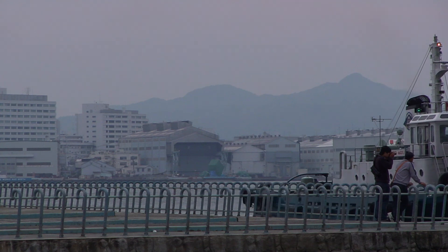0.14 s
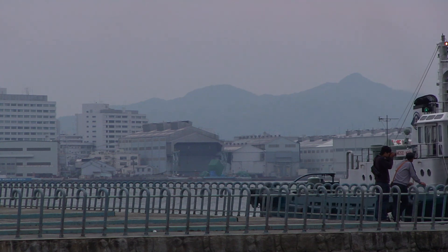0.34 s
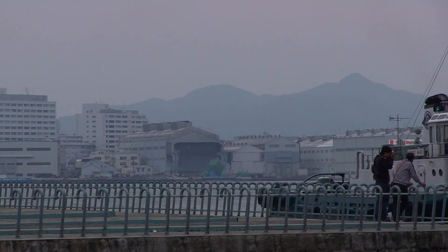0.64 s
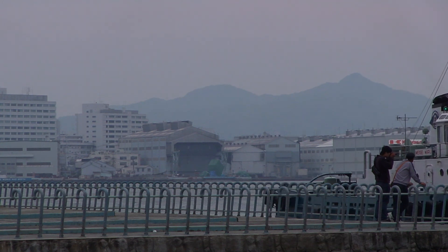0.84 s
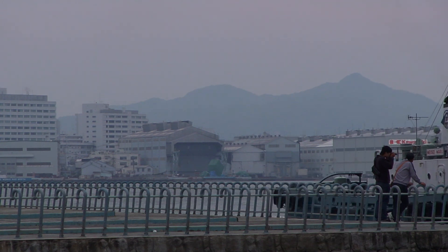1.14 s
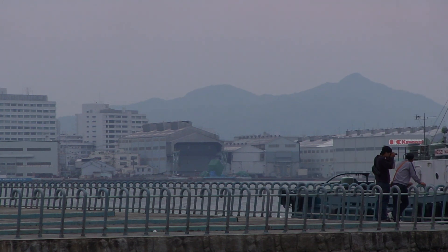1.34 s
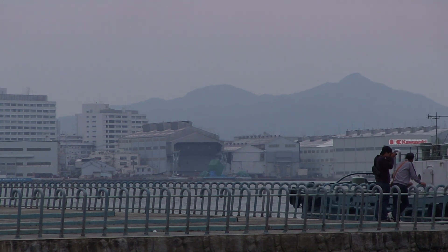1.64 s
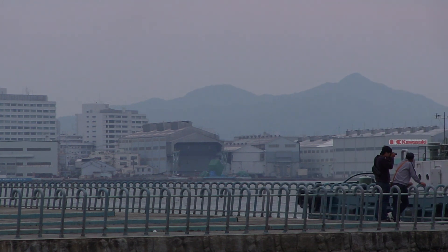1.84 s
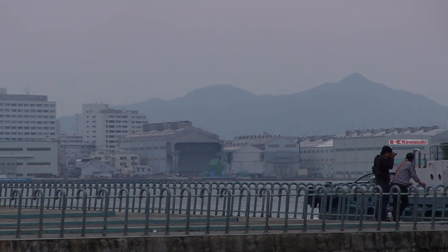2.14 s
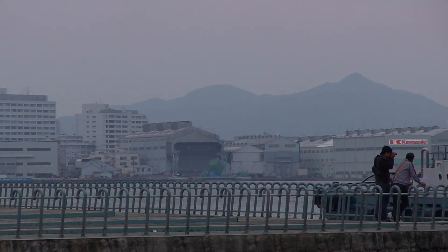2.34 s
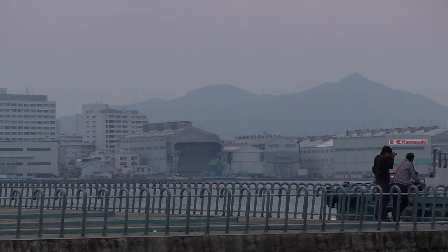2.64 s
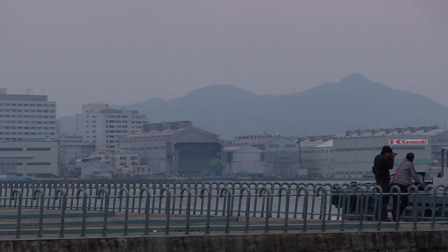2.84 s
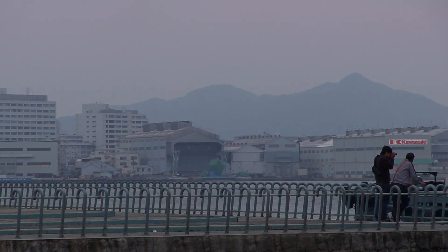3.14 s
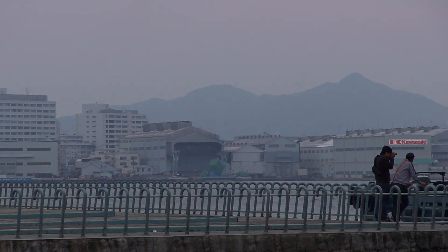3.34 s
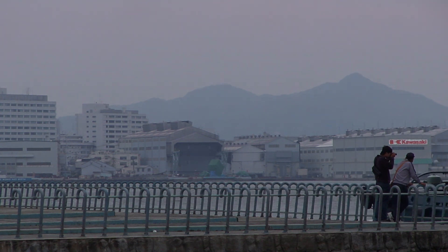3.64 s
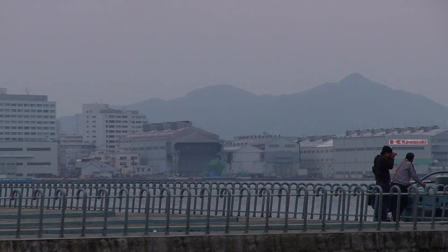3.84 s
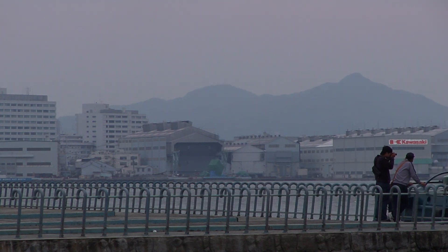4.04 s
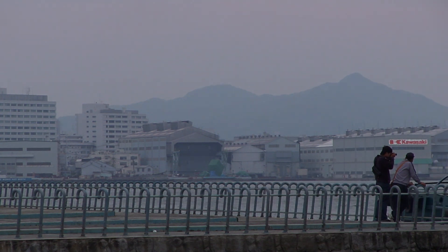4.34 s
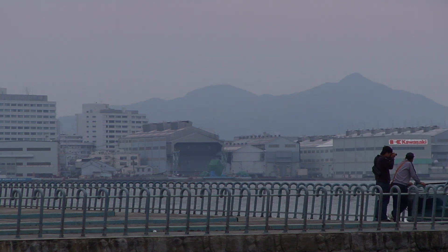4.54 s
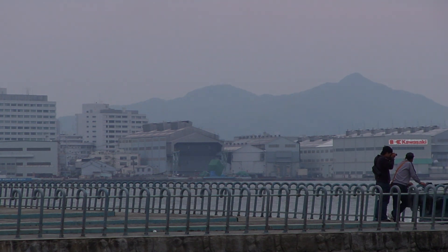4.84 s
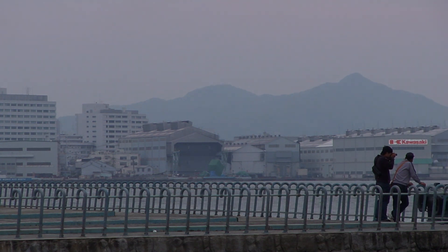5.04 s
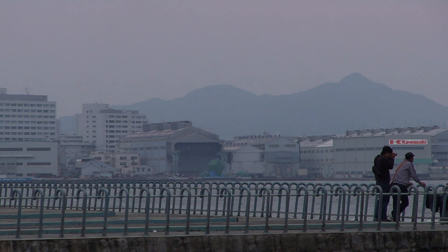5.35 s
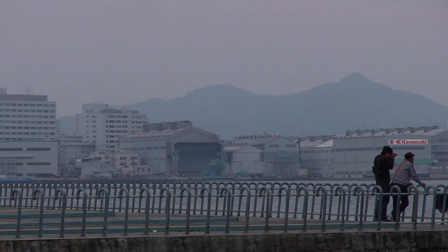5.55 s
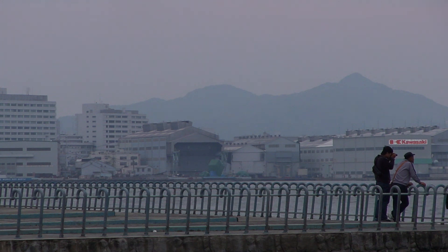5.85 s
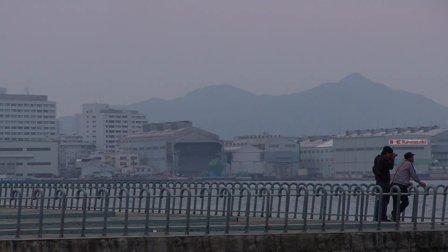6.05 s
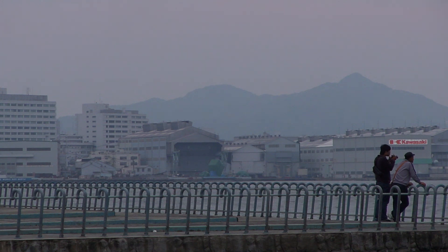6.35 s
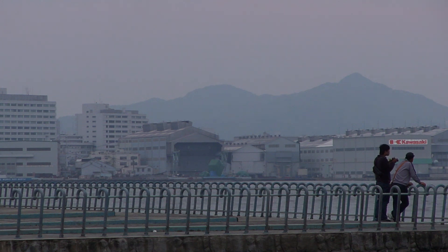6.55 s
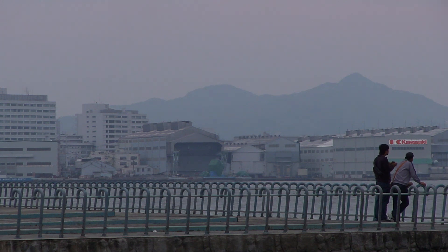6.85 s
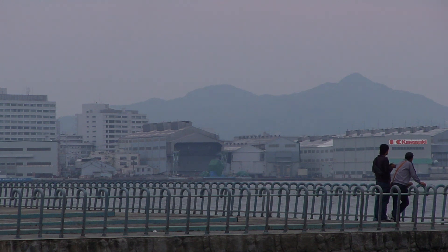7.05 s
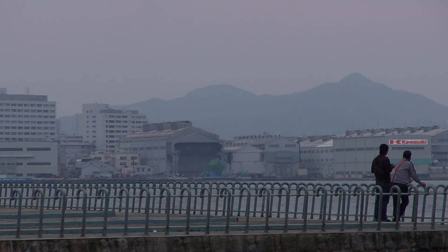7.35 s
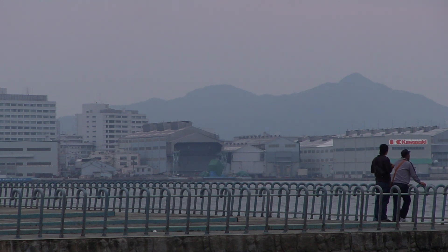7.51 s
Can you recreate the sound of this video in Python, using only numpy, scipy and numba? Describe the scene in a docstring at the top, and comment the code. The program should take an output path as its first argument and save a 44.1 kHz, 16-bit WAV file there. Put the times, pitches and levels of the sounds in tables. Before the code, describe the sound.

A smooth, dull roar of harbour machinery, wind and open water runs throughout, with soft uneven lapping at a pier. A tug's diesels drone low and slightly right, their close tones beating and wavering, fullest around 4 seconds. A hollow, breathy whirr near 900 Hz fluctuates above them. Tiny bright drops tick close by around 1, 1.3 and 2.3-2.5 seconds, then at 5, 6.4 and 6.9. Low gusts buffet the microphone at about 3-3.5 and 4.4-5 seconds, with two merged dull thumps, mainly left, near 4.9; weaker rumble follows from 6 to 7. From about 4 seconds churned water and fine foamy hiss grow, strongest from 5.7 onward with a peak near 7. A second whirr enters around 5.4, narrows to a held note, then climbs and spreads after 7. The treble is muffled; the sound ends with the wake still running at 7.6.

```python
"""An even port roar and a diesel drone, a little to the right, as a tug passes a harbour pier.
Noise bands make the roar and lapping, wandering sines the engines, and moving resonances the hollow whirr.
A second whirr joins and climbs, while churned water and bursting bubbles hiss louder astern.
Bright drops tick close by; low rumbling gusts and two dull blows strike the camera's microphone."""
import sys
import numpy as np
from scipy import signal
from scipy.fft import rfft, irfft
from scipy.io import wavfile
from numba import njit

SR = 44100
rng = np.random.default_rng(int(sys.argv[2]) if len(sys.argv) > 2 else 0)


def digitize_waveform(pressure):
    """Quantize a signal to 16-bit integers and store it at the path in sys.argv[1].

    Rows of a 2-D input are taken as channels; values are limited to [-1, 1].
    """
    field = np.atleast_2d(pressure).T
    bounded = np.clip(field, -1, 1)
    quanta = np.round(bounded * 32767).astype(np.int16)
    wavfile.write(sys.argv[1], SR, quanta)


N = 338688
TIME = np.arange(N) / SR  # s
FREQS = np.maximum(np.arange(N // 2 + 1) * SR / N, 1)  # Hz, kept above 0 for the logarithm
LEFT_RIGHT_SIGNS = np.array([[1], [-1]])  # a side signal is added left and subtracted right


def from_db(db):
    """Decibels to gain."""
    return 10 ** (np.asarray(db) / 20)


def rms_one(x):
    """Scale to unit power."""
    return x / np.sqrt(np.mean(np.abs(x) ** 2) + 1e-20)


def in_time(rows):
    """Each column of a curve, joined by straight lines, at every sample."""
    s, *columns = np.transpose(rows)
    return [np.interp(TIME, s, column) for column in columns]


def gain_at_freqs(points):
    """A short spectrum as gains, joined on a log-frequency axis."""
    hz, db = np.transpose(points)
    return from_db(np.interp(np.log(FREQS), np.log(hz), db))


def drift(rate_hz):
    """Slow chance with spread 1, changing about rate_hz times a second."""
    lowpass = 1 / (1 + (FREQS / rate_hz) ** 2)
    return rms_one(irfft(rfft(rng.standard_normal(N)) * lowpass, N))


def bump(s, half_length_s):
    """A smooth bell-shaped rise and fall around time s."""
    return np.exp(-.5 * ((TIME - s) / half_length_s) ** 2)


def fade_in(s, attack_s):
    """An even rise from 0 to 1, starting at time s."""
    return np.clip((TIME - s) / attack_s, 0, 1)


def field(excitation, spectrum, width, lag_s=0):
    """Colour two unrelated signals as middle and side; sound from the right reaches the left port late."""
    mid, side = rfft(excitation) * gain_at_freqs(spectrum) * np.sqrt(SR / 2)  # white noise to dB per Hz
    side = side * gain_at_freqs(width)
    late = np.exp(-2j * np.pi * FREQS * lag_s)
    return irfft(np.array([(mid + side) * late, mid - side]), N)


@njit
def resonate(noise, hz, width_hz, sr):
    """Noise through a moving two-stage resonance, at even power."""
    out, first, second = np.zeros(len(noise)), 0j, 0j
    for i in range(len(noise)):
        # two stages narrow the band, so each is 1.55 times as wide
        r = np.exp(-np.pi * 1.55 * width_hz[i] / sr)
        pole = r * np.exp(2j * np.pi * hz[i] / sr)
        first = pole * first + np.sqrt(1 - r) * noise[i]
        second = pole * second + (1 - r) * first
        out[i] = second.real
    return out


def hollow(hz, width_hz, side_db=-15):
    """Stereo turbulence ringing in one resonance; its middle has rms 1."""
    hz = hz + np.zeros(N)
    width_hz = np.abs(width_hz) + np.zeros(N)
    mid, side = [rms_one(resonate(noise, hz, width_hz, float(SR)))
                 for noise in rng.standard_normal((2, N))]
    return mid + from_db(side_db) * side * LEFT_RIGHT_SIGNS


# roar of port, wind and open water, before its overall level: freq_hz [Hz], level_db [dB per Hz]
ROAR_SPECTRUM = [(25, -104), (48, -98.5), (73, -78), (100, -67.5), (165, -61), (330, -63.5), (620, -60),
                 (1400, -63), (2050, -70.5), (3050, -90.5), (4500, -98), (5900, -90), (8300, -99),
                 (10200, -106)]
# wavelets lapping at the pier: freq_hz [Hz], level_db [dB per Hz]
LAPPING_SPECTRUM = [(80, -99.5), (180, -71.5), (400, -67), (750, -75), (1400, -73), (4000, -125)]
# stereo width of the far field: freq_hz [Hz], side_minus_mid_db [dB]
FAR_FIELD_WIDTH = [(50, 4), (150, -24), (300, -18), (600, -18), (1000, -15), (2000, -10.5), (3500, -7),
                   (6000, -5.5), (10000, -0.5)]
# brief swells in the roar, before the low cut:
# peak_s [s], half_length_s [s], centre_hz [Hz], width_hz [Hz], level_db [dB rms at the peak]
ROAR_SWELLS = [(1.502, 0.14, 1080, 76, -39.5), (2.246, 0.049, 147, 54, -34), (3.522, 0.1, 1450, 250, -39),
               (3.88, 0.083, 820, 50, -36), (4.02, 0.025, 260, 190, -38), (4.078, 0.094, 408, 13, -38),
               (4.6, 0.49, 997, 124, -40), (4.683, 0.081, 169, 41, -37.5), (4.933, 0.053, 239, 35, -37),
               (6.4, 0.1, 137.7, 15, -43), (6.82, 0.061, 165, 36, -38), (7.454, 0.18, 200, 110, -35.5),
               (7.525, 0.14, 760, 350, -32.5)]
SWELL_LOWEST_HZ = 115


def port(level_db=-0.85, waver_db=0.39, lap_waver_db=2.5):
    """Far machinery, wind and ripples merge into a smooth roar; wavelets lap unevenly at the pier."""
    roar = field(rng.standard_normal((2, N)), ROAR_SPECTRUM, FAR_FIELD_WIDTH)
    roar = roar * from_db(level_db + waver_db * drift(2.3))
    laps = field(rng.standard_normal((2, N)), LAPPING_SPECTRUM, FAR_FIELD_WIDTH)
    laps = laps * from_db(lap_waver_db * drift(6))
    swells = sum(from_db(db) * bump(s, half_length_s) * hollow(hz, width_hz)
                 for s, half_length_s, hz, width_hz, db in ROAR_SWELLS)
    low_cut = signal.butter(2, SWELL_LOWEST_HZ, "high", fs=SR, output="sos")
    return roar + laps + signal.sosfilt(low_cut, swells)


# diesel drone, before fading and screening: pitch_hz [Hz], level_db [dB, sine amplitude]
DIESEL_TONES = [(55.6, -69), (60.3, -57.5), (88, -55), (90.4, -54.5), (117.7, -61.5), (134.6, -50),
                (136.8, -47.5), (138.7, -46), (144.2, -46.5), (163, -53), (170.4, -53), (174.8, -50),
                (198.5, -48), (202, -53), (233.5, -49.5), (236.5, -48), (293, -52.5), (348.5, -50),
                (383, -46)]
# the exhaust swings into the open and away again
EXHAUST_S, EXHAUST_HALF_S = 4, 2  # loudest moment and half length
EXHAUST_DB, SCREENED_DB = -0.9, -3.5  # gain in the open and when screened


def diesels(fade_db=2.0, wander_rad=0.27, side_db=-14):
    """Close engine tones beat against each other; the path over the water makes each fade and wander."""
    out = np.zeros((2, N))
    for hz, db in DIESEL_TONES:
        phase = 2 * np.pi * (hz * TIME + rng.random()) + wander_rad * drift(0.61)
        side = from_db(side_db) * np.sin(phase + 2 * np.pi * rng.random())
        out += from_db(db + fade_db * drift(1.8)) * (np.sin(phase) + side * LEFT_RIGHT_SIGNS)
    exposure = bump(EXHAUST_S, EXHAUST_HALF_S)
    return out * from_db(SCREENED_DB + (EXHAUST_DB - SCREENED_DB) * exposure)


# hollow ventilation whirr, before its wavering:
# time_s [s], centre_hz [Hz], width_hz [Hz], level_db [dB rms]
FAN_CURVE = [(0, 900, 130, -34), (0.6, 877, 120, -38.5), (1.0, 914, 100, -33), (1.28, 880, 100, -35.5),
             (1.55, 900, 120, -44.5), (2.0, 893, 90.4, -34.5), (2.3, 910, 129, -40), (2.55, 874, 60, -37),
             (2.75, 880, 120, -39), (3.45, 900, 130, -37), (3.75, 915, 135, -33), (4.05, 860, 120, -36.5),
             (4.35, 873, 119.5, -36.5), (4.7, 888, 60, -35), (5.3, 868, 110, -36), (6.6, 895, 89.6, -36.5),
             (7.05, 882, 70.4, -38), (7.6, 893, 45, -40)]
# second whirr that fades in, narrows to a held note, then climbs and spreads, before its flutter:
# time_s [s], centre_hz [Hz], width_hz [Hz], level_db [dB rms]
SPIN_CURVE = [(5.33, 985, 80, -52), (5.47, 973, 70, -31), (5.65, 1010, 95, -38), (5.85, 1012, 55, -32.5),
              (6.1, 1032, 35, -33.5), (6.3, 1036, 45, -34.5), (6.68, 1017, 54.5, -32.5),
              (6.98, 1032, 56.3, -34), (7.2, 1094, 110, -34.5), (7.55, 1094, 150, -35)]
# its octave swells with the wake: level at 0 dB of wake, and dB per dB of wake
OCTAVE_WIDTH_HZ, OCTAVE_DB, OCTAVE_FOLLOWS = 167, -40, 2.2


def whirr(wake_db, waver_db=0.1, flutter_db=0.7, wobble_hz=5, fan_wander_hz=16):
    """A breathy machine band wavers and wanders; a second wobbles and climbs together with its octave."""
    hz, width_hz, db = in_time(FAN_CURVE)
    fan_level = from_db(db + waver_db * drift(7.1))
    fan = fan_level * hollow(hz + fan_wander_hz * drift(10), width_hz)

    hz, width_hz, db = in_time(SPIN_CURVE)
    hz = hz + wobble_hz * drift(6.2)
    note = from_db(db + flutter_db * drift(7)) * hollow(hz, width_hz)
    octave = from_db(OCTAVE_DB + OCTAVE_FOLLOWS * wake_db) * hollow(2 * hz, OCTAVE_WIDTH_HZ)
    return fan + note + octave


# churned water astern, before the wake's level: freq_hz [Hz], level_db [dB per Hz]
CHURN_SPECTRUM = [(50, -100), (95, -66.5), (145, -62.5), (300, -63.5), (700, -65.5), (1300, -68.5),
                  (1750, -72), (2350, -73), (3100, -95.5), (5000, -93), (8000, -120)]
# bursting foam, before the wake's level: freq_hz [Hz], level_db [dB per Hz]
FOAM_SPECTRUM = [(2000, -110), (3500, -86.5), (4600, -89), (5600, -77.5), (6500, -78), (8100, -85.5),
                 (9300, -97), (10300, -104), (11200, -120)]
# stereo width of the wake: freq_hz [Hz], side_minus_mid_db [dB]
WAKE_FIELD_WIDTH = [(100, -1), (250, -14.5), (550, -20), (1500, -17), (3500, -6.5), (6000, -7),
                    (9000, -1.5)]
WAKE_LAG_S = 2.1e-5  # the left port hears the wake this much late


def wake(churn_db, foam_db, surge_db=0.5, fizz_db=0.9, bursts_per_s=9000, size_db=1.5):
    """The propellers churn the water; thousands of tiny bubbles of uneven size burst on top."""
    churn = field(rng.standard_normal((2, N)), CHURN_SPECTRUM, WAKE_FIELD_WIDTH, WAKE_LAG_S)
    churn = churn * from_db(churn_db + surge_db * drift(5.8))

    born = rng.random((2, N)) < bursts_per_s / SR
    sizes = from_db(size_db * np.minimum(rng.exponential(1, (2, N)), 4))
    bursts = born * sizes * rng.choice([-1, 1], (2, N))
    foam = field(rms_one(bursts), FOAM_SPECTRUM, WAKE_FIELD_WIDTH, WAKE_LAG_S)
    return churn + foam * from_db(foam_db + fizz_db * drift(5.1))


# small drops ticking close by, before ringing and balance: start_s [s], level_db [dB, strength of the hit]
DROP_HITS = [(0.893, -46), (0.96, -42), (1.0535, -37), (1.0625, -46), (1.3152, -40), (2.3035, -41.5),
             (2.44, -45), (2.4758, -39.5), (4.989, -45), (6.3799, -37), (6.9406, -38)]


def drops(hz=7800, width_hz=4200, decay_s=0.00084, left_db=3, faint_per_s=14, faint_db=-54):
    """Each drop is a bright tick, a little left, dying within milliseconds; fainter ones fall at random."""
    faint_levels = from_db(faint_db + 3 * rng.standard_normal(N))
    hits = (rng.random(N) < faint_per_s / SR) * faint_levels
    for s, db in DROP_HITS:
        hits[round(s * SR)] = from_db(db)
    decay = np.exp(-1 / (decay_s * SR))
    envelope = signal.lfilter([1], [1, -decay], hits + 1e-18)
    return .5 * envelope * hollow(hz, width_hz, side_db=0) * from_db([[left_db], [-left_db]])


# colour of the wind, only its shape counts: freq_hz [Hz], level_db [relative dB per Hz]
BUFFET_SPECTRUM = [(30, -52), (75, -9.5), (145, 7), (250, 2.5), (380, -2.5), (540, -13), (1200, -59)]
# gusts on the microphone, before their lumps:
# start_s [s], hold_s [s], left_level_db [dB rms], right_level_db [dB rms]
WIND_GUSTS = [(2.957, 0.08, -30.5, -37), (3.102, 0.045, -32, -36), (3.368, 0.033, -34, -37),
              (3.508, 0.049, -31, -40), (4.38, 0.3, -35, -38), (4.76, 0.21, -29, -30.5),
              (6.007, 1.05, -37, -38)]
GUST_ATTACK_S, GUST_RELEASE_S, CALM_DB = 0.025, 0.056, -63


def wind(lumps_db=-0.1, opposed=0.35):
    """Eddies push one port and suck a little at the other; gusts rise, hold and die as a lumpy rumble."""
    eddies = irfft(rfft(rng.standard_normal((2, N))) * gain_at_freqs(BUFFET_SPECTRUM), N)
    pressure = rms_one(eddies - opposed * eddies[::-1])
    force = from_db(CALM_DB)
    for s, hold_s, left_db, right_db in WIND_GUSTS:
        release = np.exp(-np.maximum(TIME - s - hold_s, 0) / GUST_RELEASE_S)
        envelope = fade_in(s, GUST_ATTACK_S) * release
        force = np.hypot(force, from_db([[left_db], [right_db]]) * envelope)  # powers add
    return force * from_db(lumps_db * drift(12)) * pressure


# hardest blows of the strongest gust, before the ring: start_s [s], left_level_db [dB, gain]
WIND_THUMPS = [(4.8635, -7.5), (4.8885, -15)]
# dull ring of a blow on the microphone: pitch_hz [Hz], level_db [dB, gain], t60_s [s to fall 60 dB]
THUMP_RING = [(161, -4.5, 0.12), (225, -4, 0.11), (370, -6.5, 0.12)]


def thumps(attack_s=0.006, right_db=-10):
    """A hard eddy pushes on the left port and sucks at the right, with a short, dull ring."""
    push = np.zeros(N)
    for s, db in WIND_THUMPS:
        age = np.maximum(TIME - s, 0)
        ring = sum(from_db(mode_db - 60 * age / t60_s) * np.sin(2 * np.pi * hz * age)
                   for hz, mode_db, t60_s in THUMP_RING)
        push += from_db(db) * fade_in(s, attack_s) * ring
    return np.array([push, -from_db(right_db) * push])


# how much of the wake is heard as the stern comes round: time_s [s], level_db [dB gain]
WAKE_CURVE = [(0, -31.5), (3.75, -15.5), (4.35, -7.5), (4.95, -6), (5.75, -2), (6.2, -1.5), (6.6, -4),
              (6.95, 0.2), (7.4, -3.5), (7.68, -2)]
# the churn shows earlier than the foam: its gain at 0 dB of wake, and its share of the wake's swing
CHURN_DB, CHURN_FOLLOWS = 1.5, 0.55


def scene(lean_db=0.64):
    """The harbour leans a little to the right; the wind is at the microphone itself."""
    wake_db, = in_time(WAKE_CURVE)
    churn_db = CHURN_DB + CHURN_FOLLOWS * wake_db
    harbour = port() + diesels() + whirr(wake_db) + wake(churn_db, wake_db) + drops()
    return harbour * from_db([[-lean_db], [lean_db]]) + wind() + thumps()


# narrow dead bands in the camera's response: centre_hz [Hz], width_hz [Hz, of one notch stage]
CAMERA_NOTCHES = [(3003, 278), (4010, 390), (5030, 490)]
CUTOFF_HZ = 10450


def record(dry, depth=0.96):
    """The camera notches out most of three treble bands, two stages each, and cuts the top."""
    for hz, width_hz in CAMERA_NOTCHES:
        b, a = signal.iirnotch(hz, hz / width_hz, fs=SR)
        notched = signal.lfilter(b, a, signal.lfilter(b, a, dry))
        dry = dry + depth * (notched - dry)
    return signal.sosfilt(signal.butter(20, CUTOFF_HZ, fs=SR, output="sos"), dry)


dry = scene()
out = record(dry)
digitize_waveform(out)
```